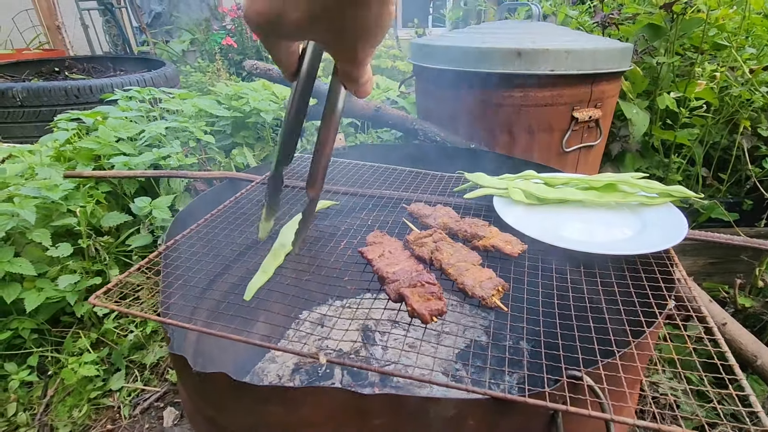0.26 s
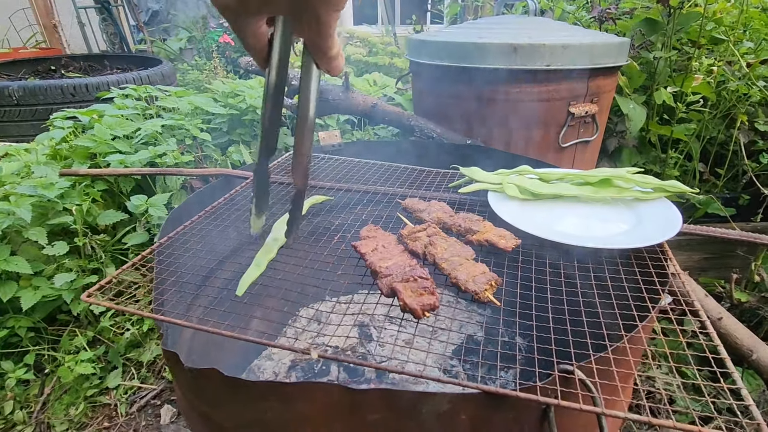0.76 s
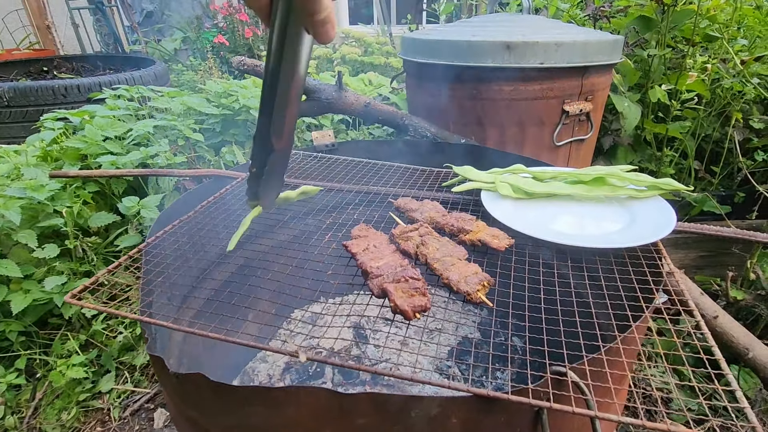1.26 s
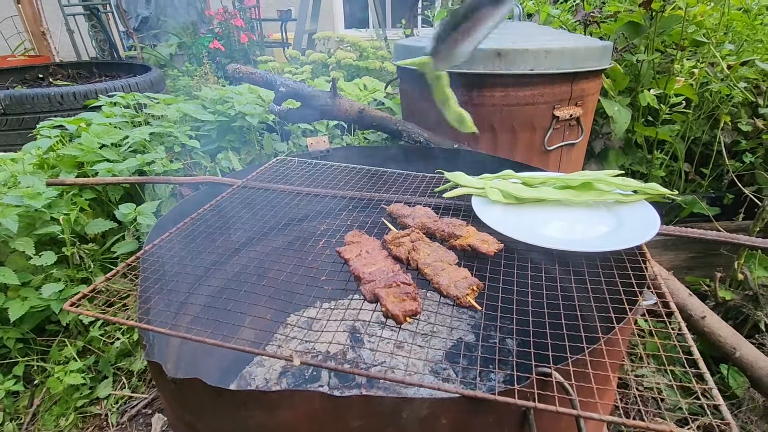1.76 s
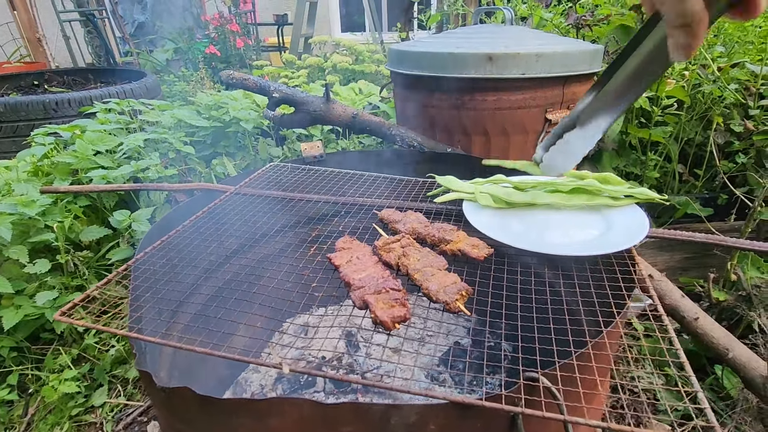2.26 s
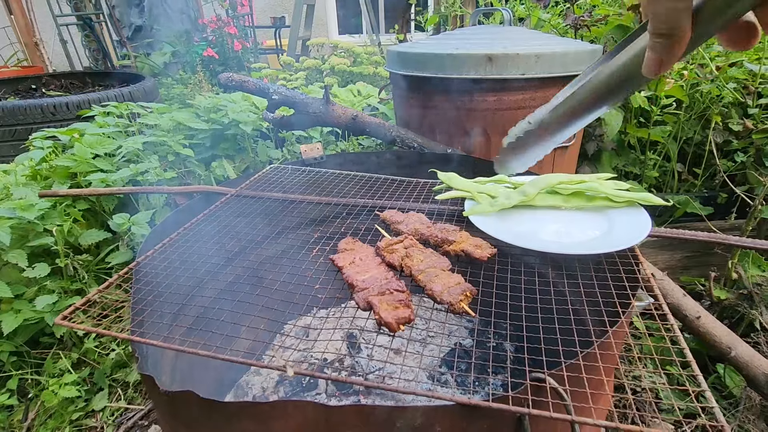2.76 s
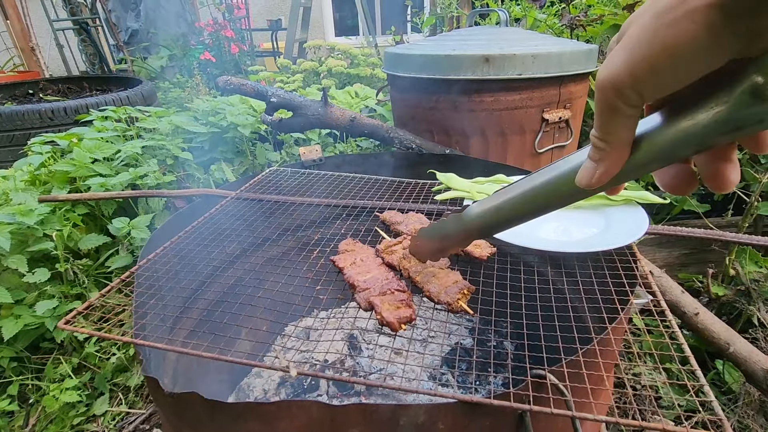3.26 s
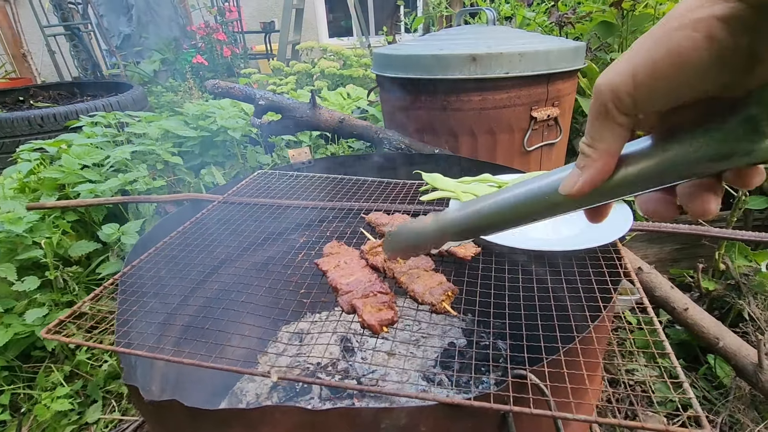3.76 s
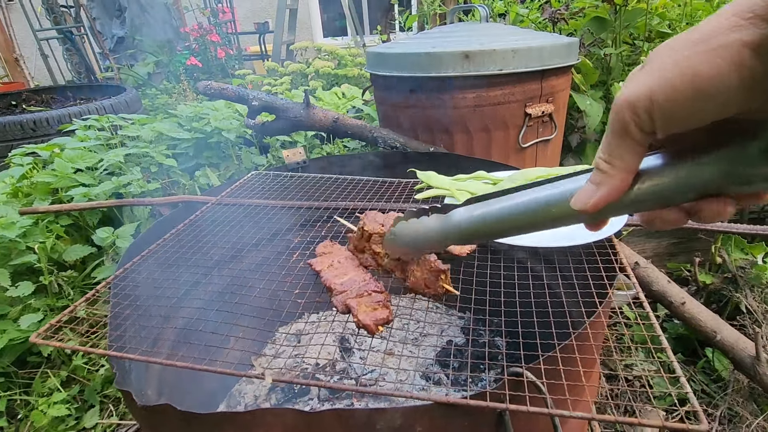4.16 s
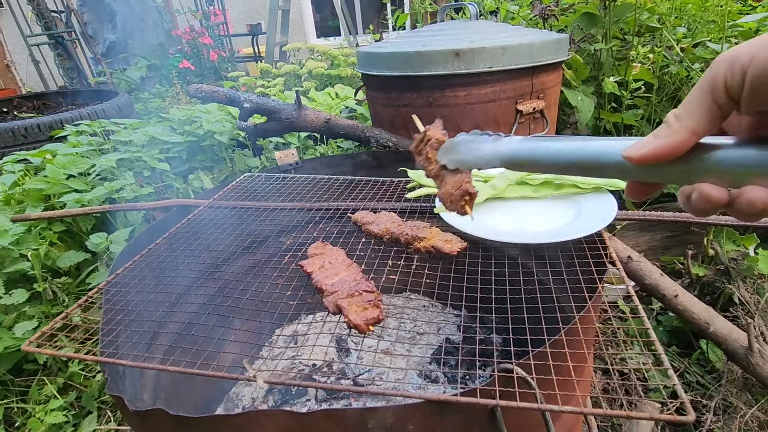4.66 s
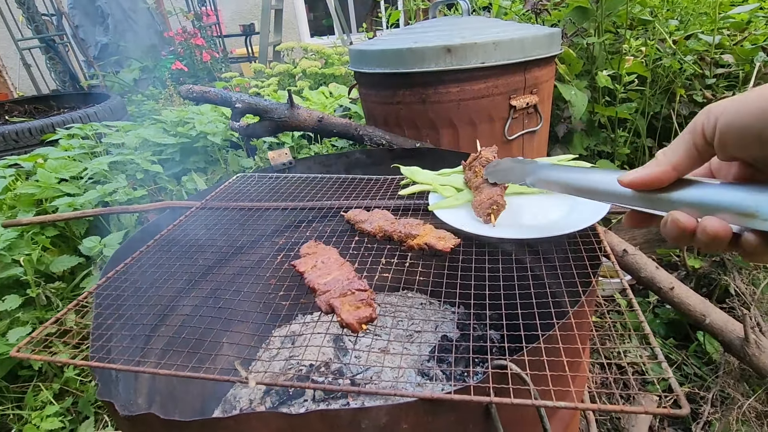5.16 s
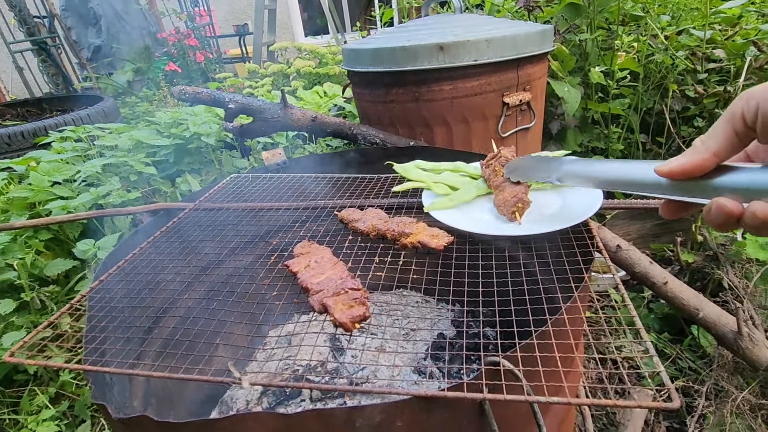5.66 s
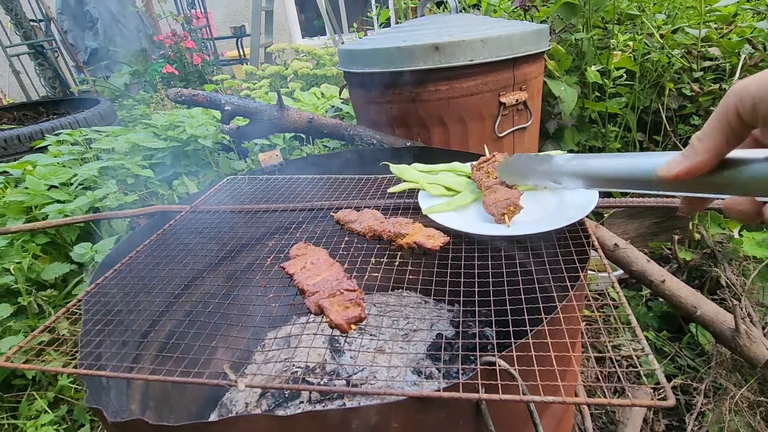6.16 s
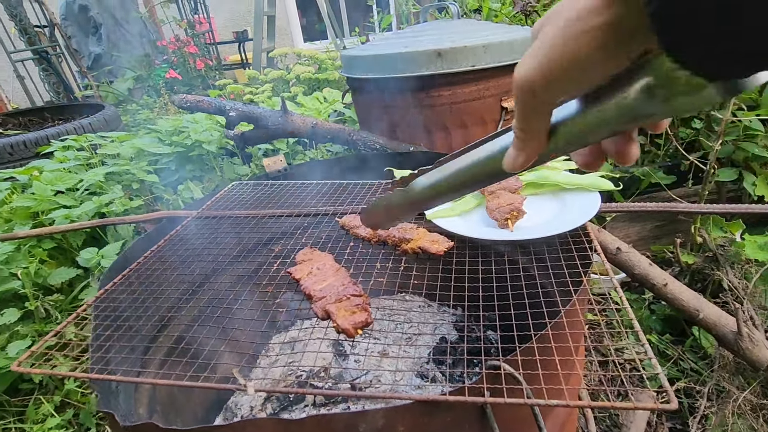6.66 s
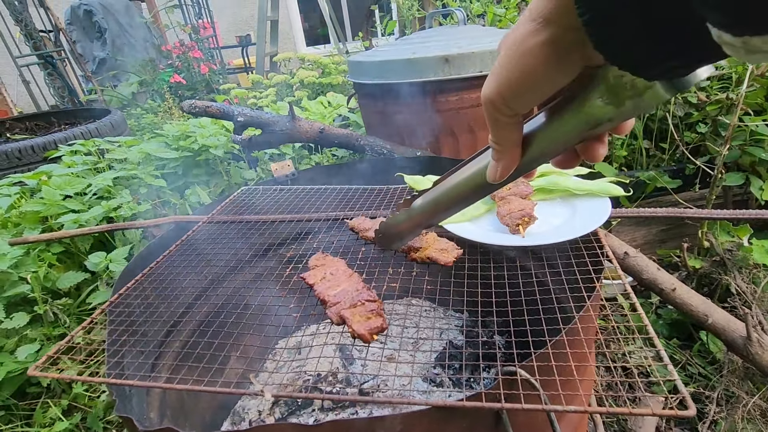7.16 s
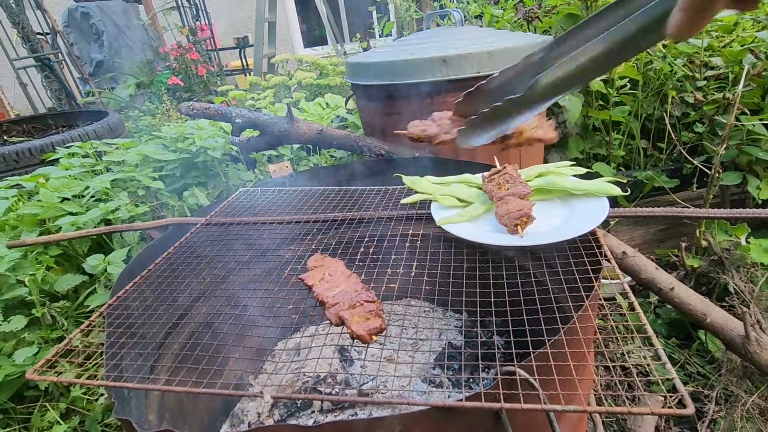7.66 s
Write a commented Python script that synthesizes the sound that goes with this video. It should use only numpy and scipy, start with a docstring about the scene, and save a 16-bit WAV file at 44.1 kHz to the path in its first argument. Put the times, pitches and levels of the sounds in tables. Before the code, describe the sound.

A low pulsing machine hum and soft outdoor air run throughout. Within the first second tongs clatter loudly on thin wire mesh, ringing briefly, and food scrapes free. A light clink on a plate follows, then quiet crackles, muted mesh taps and cloth rustles as more pieces are lifted. A regular distant drip echoes hollowly, a bird trills faintly, and a far engine joins late. The handling is close to a stereo microphone, the background wide and distant.

```python
"""Steel tongs pick food off the wire rack of a charcoal barrel grill in a garden and once set some on a plate.
Rack and tongs ring as banks of dying sines under noise; fat and wood snap in short noise bursts.
Food scrapes and sizzles as it is dragged and a sleeve rustles: random grains shaped by each gesture.
Behind are a throbbing machine hum (sines, narrow noise), a faint regular drip (clicks, filtered noise),
insects (noise bands), a far bird (blurred sines) and, late on, a far motor (gliding harmonics)."""
import sys
import numpy as np
from scipy import signal
from scipy.fft import rfft, irfft
from scipy.io import wavfile

SR = 44100
rng = np.random.default_rng(int(sys.argv[2]) if len(sys.argv) > 2 else 0)


def transcribe(u):
    """Save the signal u as a 16-bit wav file named by the first command-line argument.

    u: samples, shape (n,) or (channels, n), limited to [-1, 1]; the rate is SR.
    q: integer samples, one column per channel.
    """
    v = np.clip(np.atleast_2d(u).T, -1, 1)
    q = np.round(v * 32767).astype(np.int16)
    wavfile.write(sys.argv[1], SR, q)


N = 349272
TIME, HZ = np.arange(N) / SR, np.fft.rfftfreq(N, 1 / SR)
RING = TIME[:SR // 2]  # time axis of one hit [s]
SIDES = np.array([[.5], [-.5]])  # halves of a left-minus-right dB

# main modes of the rack: (frequency [Hz], relative level [dB], t60 [s])
RACK_MODES = [(145, 3, .2), (172, 8, .2), (215, 0, .25), (310, -6, .3), (350, -2.5, .35), (576, 0, .36),
              (602, -2, .4), (957, 0, .35), (1090, -12, .6), (1190, -11, .6), (1658, -5, .28),
              (1752, -5, .25), (2018, -1, .25), (2099, 0, .33), (2218, -7, .22), (2380, -10, .28),
              (2637, 0, .27), (2690, -4, .27), (2920, -4, .3), (3131, -1, .25), (3210, -5, .22),
              (3370, -4, .3), (3444, -3, .2), (3530, -8, .2), (4398, -7, .17), (4613, -10, .18),
              (5135, -7, .14), (5367, -9, .12), (5680, -10, .13), (6191, -13, .12), (7230, -10, .12)]
# spectrum of the weaker wire modes: (frequency [Hz], relative level [dB])
WIRE_SPECTRUM = [(150, -15), (330, 1.5), (450, -13.5), (560, 0), (800, -4.5), (1100, -2), (1400, -6),
                 (1700, -4.5), (2400, -1.5), (3300, -3.5), (4000, -7.5), (5500, -15.5), (7800, -17.5),
                 (9000, -21), (16000, -31)]
# food dragged over the wires, or once set down on a plate:
# (start [s], length [s], scrape [dB before trim], sizzle [dB before trim])
FOOD_DRAGS = [(0.336, 0.29, -72, -69), (0.732, 0.27, -53.5, -67), (0.848, 0.2, -63.5, -74),
              (0.97, 0.061, -73, -64), (1.11, 0.96, -71, -96), (2.535, 0.22, -70, -71.5),
              (4.085, 0.21, -64.5, -65), (4.17, 0.11, -72, -82), (4.296, 0.1, -68, -77),
              (6.618, 0.3, -70.5, -64.5), (6.971, 0.28, -66, -68.5)]
# a drag takes hold quickly, holds for a share of its length, then sinks to LET_GO_DB by its end
GRIP_S, HOLD_SHARE, LET_GO_DB = 0.019, 0.29, -16


def amp(db):
    """Decibels to gain."""
    return 10 ** (np.asarray(db) / 20)


def evened(x):
    """Scales to rms 1."""
    return x / np.sqrt(np.mean(x ** 2) + 1e-30)


def read(points, hz):
    """Interpolates a curve on a log-frequency axis."""
    f, value = np.transpose(points)
    return np.interp(np.log(hz + 1), np.log(f + 1), value)


def add(mix, s, sound):
    """Adds a stereo sound at time s."""
    part = mix[:, max(round(s * SR), 0):][:, :sound.shape[1]]
    part += sound[:, :part.shape[1]]


def wander(hz):
    """Slow random drift of rms 1: noise low-passed at hz."""
    return evened(irfft(rfft(rng.standard_normal(N)) / (1 + (HZ / hz) ** 4), N))


def swing(depth_db, hz):
    """Gain that drifts at random within +-depth_db."""
    return amp(depth_db * np.tanh(wander(hz)))


def colour(x, points, size=1024):
    """Causal minimum-phase filter with the given (Hz, dB) curve."""
    log_gain = np.log(amp(read(points, abs(np.fft.fftfreq(size, 1 / SR)))))
    taps = np.fft.ifft(np.exp(np.conj(signal.hilbert(log_gain)))).real
    return signal.oaconvolve(x, taps[None], axes=1)[:, :x.shape[1]]


def spread(gain, pair=None, lean=None):
    """Noise of a given spectrum at two microphones: alike in the bass, less so above; rms 1."""
    # (frequency [Hz], left-right likeness [-1..1])
    likeness = [(60, 1), (130, 0.88), (290, 0.95), (640, -0.042), (1410, -0.1), (3100, -0.039),
                (6820, -0.023), (15000, -0.05)]
    # (frequency [Hz], left minus right [dB])
    usual_lean = [(60, -0.5), (110, 3), (200, 1), (380, -4), (700, 3.5), (1290, 2.5), (2380, 2),
                  (4400, -5.5), (8120, -5.5), (15000, 5)]
    if lean is None:
        lean = usual_lean
    a, b = rfft(rng.standard_normal((2, N)) if pair is None else pair)
    same = np.clip(read(likeness, HZ), -1, 1)
    right = same * a + np.sqrt(1 - same ** 2) * b
    return evened(irfft(np.array([a, right]) * gain * amp(SIDES * read(lean, HZ)), N))


def fuzzy(lines):
    """Unsteady tones: noise in narrow resonances, each at its own rms level."""
    power = np.zeros(len(HZ))
    for hz, width_hz, db in lines:
        resonance = evened(1 / (1 + ((HZ - hz) / width_hz * 1.89) ** 2))
        power += (amp(db) * resonance) ** 2
    return np.sqrt(power.mean()) * spread(np.sqrt(power))


def grains(per_s, spread_db):
    """Random tiny clicks, a few much larger than the rest; rms 1."""
    sizes = amp(spread_db * np.minimum(rng.exponential(1, (2, N)), 4))
    present = rng.random((2, N)) < per_s / SR
    return evened(sizes * rng.choice([-1, 1], (2, N)) * present)


def modes(table):
    """Dying sines; the higher the mode, up to 1.5 kHz, the more its phase differs between the microphones."""
    out = np.zeros((2, len(RING)))
    for hz, db, t60_s in table:
        t = RING[:round(t60_s * SR)]
        phase = 2 * np.pi * rng.random() + SIDES * rng.choice([-1, 1]) * min(hz / 1000, 1.5)
        out[:, :len(t)] += amp(db - 60 * t / t60_s) * np.sin(2 * np.pi * hz * t + phase)
    return out


def chatter(sound, length_s, bounce):
    """A first touch and a quickly fading run of bounces."""
    touches = bounce * rng.standard_normal(len(RING)) * (rng.random(len(RING)) < 900 / SR)
    touches *= np.exp(-RING / max(length_s, 1e-4))
    touches[0] = 1
    return signal.fftconvolve(sound, touches[None], axes=1)[:, :len(RING)]


def blow(sound, levels_db, size=768):
    """Sets how strongly one contact drives the body, bright and top ranges in its first instants."""
    # body, bright and top ranges: (from [Hz], to [Hz])
    ranges = [(500, 4000), (4500, 8500), (9000, 16000)]
    hz = np.fft.rfftfreq(size, 1 / SR)
    power = 2 * (abs(rfft(sound[:, :size])) ** 2).mean(0) / size ** 2
    body, bright, top = (db - 10 * np.log10(power[(hz > lo) & (hz < hi)].sum())
                         for db, (lo, hi) in zip(levels_db, ranges))
    return colour(sound, [(3500, body), (5300, bright), (7600, bright), (10000, top)])


def blur(hz):
    """Many paths from a far source: a random drift of gain and phase at each microphone."""
    return np.array([wander(hz) + 1j * wander(hz) for _ in SIDES])


def mains_hum(hz=120, level_db=-46, drift_rad=0.087, drift_hz=0.56):
    """Steady mains hum: one sine of slowly drifting phase."""
    hum = np.sin(2 * np.pi * hz * TIME + drift_rad * wander(drift_hz))
    return np.sqrt(2) * amp(level_db) * hum * amp(SIDES * 0.69)


def machine_drone():
    """A machine's unsteady tones: narrow noise bands wavering together."""
    # (frequency [Hz], width [Hz], level [dB before wavering])
    tones = [(117.3, 16, -65), (189, 45, -71), (234.4, 19, -62), (348, 39, -77), (694, 113, -73.5)]
    return fuzzy(tones) * swing(2.0, 4.8)


def outdoor_air(level_db=-53, gust_hz=180):
    """Coloured noise that swells gently, its low rumble coming and going more."""
    # (frequency [Hz], relative level [dB])
    air_spectrum = [(15, -15.5), (26, 4), (34, -12.5), (50, 2.5), (80, 2.5), (105, -1.5), (150, -8.5),
                    (200, -10), (280, -14), (400, -21), (500, -29.5), (1000, -28.5), (2000, -38.5),
                    (6000, -53), (15000, -70.5)]
    air = amp(level_db) * swing(1.5, 5.1) * spread(amp(read(air_spectrum, HZ)))
    rumble = irfft(rfft(air) / (1 + (HZ / gust_hz) ** 4), N)
    return air + rumble * (swing(2.0, 9.8) - 1)


def insects():
    """Insects: two overlapping noise bands that flicker together."""
    # (frequency [Hz], width [Hz], level [dB before flicker])
    chirr_bands = [(4790, 150, -78.5), (4570, 710, -81)]
    return fuzzy(chirr_bands) * swing(2.5, 11)


def throb(hz=57.84, level_db=-56, drift_rad=1.5, drift_hz=4):
    """The machine's low note, a sine of drifting phase, swells once a second and slowly grows."""
    crest_s, period_s, depth_db, growth_db_per_s = 0.66, 1, 4, 0.5
    swell_db = growth_db_per_s * (TIME - TIME.mean())
    swell_db += depth_db * np.cos(2 * np.pi * (TIME - crest_s) / period_s)
    tone = np.sin(2 * np.pi * hz * TIME + drift_rad * wander(drift_hz))
    return np.sqrt(2) * amp(level_db + swell_db) * tone


def drag_force(start_s, length_s):
    """Gain over time of one drag: grip, hold, release."""
    t = TIME - start_s
    released = np.maximum(t / length_s - HOLD_SHARE, 0) / (1 - HOLD_SHARE)
    return np.clip(t / GRIP_S, 0, 1) * amp(LET_GO_DB * released)


def crackle_spectrum():
    """Gain over frequency shared by sizzle and cloth."""
    # (frequency [Hz], relative level [dB])
    crackle_curve = [(150, -8), (500, 6), (1000, 1), (2000, -2.5), (3000, 1.5), (4000, -3.5), (5200, 2),
                     (6700, -4), (7600, -0.5), (8700, -12.5), (10500, -8.5), (15000, -12)]
    return amp(read(crackle_curve, HZ))


def crackle(per_s, spread_db, flicker_db):
    """Dense, flickering coloured grains of rms about 1."""
    return spread(crackle_spectrum(), grains(per_s, spread_db)) * amp(flicker_db * wander(34))


def sizzle(trim_db=1, still_db=-81.5, per_s=6000, spread_db=2.5, flicker_db=2.5):
    """Bursting bubbles of fat: faint at rest, flaring whenever food is dragged."""
    flares = sum((amp(db) * drag_force(s, length_s)) ** 2 for s, length_s, _, db in FOOD_DRAGS)
    level = np.sqrt(amp(still_db) ** 2 + flares)
    return amp(trim_db) * level * crackle(per_s, spread_db, flicker_db)


def hiss_swell(middle_s, length_s):
    """Gain over time of one swell of fine hiss: a smooth bell."""
    return np.exp(-(2 * (TIME - middle_s) / length_s) ** 2)


def sleeve(trim_db=1, per_s=6000, spread_db=3.0, flicker_db=0.84,
           crease_per_s=14, crease_db=-12, crease_t60_s=0.078):
    """Fine hiss in swells, mostly cloth rustling as the arm moves, with a crease ticking now and then."""
    # swells of fine hiss: the arm's moves, a scrape's onset, a sizzle as the tongs let go:
    # (crest [s], length [s], level [dB before trim])
    hiss_swells = [(.05, 1, -74), (1.145, 0.21, -68.5), (1.59, 0.72, -69), (2.206, 0.38, -68.5),
                   (2.542, 0.045, -66), (2.757, 0.73, -75), (3.13, 0.11, -72.5), (3.407, 0.092, -72.5),
                   (3.91, 0.12, -71.5), (4.108, 0.064, -63), (4.665, 0.35, -68.5), (4.938, 0.39, -76),
                   (5.6, 0.23, -70.5), (6.057, 0.12, -63.5), (6.242, 0.27, -67), (6.487, 0.43, -69.5),
                   (7.42, 0.34, -69.5), (7.565, 0.21, -73.5), (7.85, 0.73, -71.5)]
    level = np.sqrt(sum((amp(db) * hiss_swell(s, length_s)) ** 2 for s, length_s, db in hiss_swells))
    tick = rng.standard_normal((2, len(RING))) * amp(-60 * RING / crease_t60_s)
    creases = signal.oaconvolve(grains(crease_per_s, 2.0)[:1], tick, axes=1)[:, :N]
    cloth = crackle(per_s, spread_db, flicker_db) + amp(crease_db) * spread(crackle_spectrum(), creases)
    return amp(trim_db) * level * cloth


def snaps(trim_db=-1, tail_db=-26, tail_t60_s=0.2, rise_s=0.0003, split=0.082):
    """Short dry cracks, each with a brief cluster of woody notes and a faint tail from the barrel."""
    # snaps of fat, coals and skewers: (time [s], body [dB before trim], bright [dB before trim],
    # top [dB before trim], t60 [s], pan, left minus right [dB], note [Hz], relative note level [dB])
    snap_events = [(0.06, -82, -76, -76.5, 0.13, 12, 3580, -12),
                   (1.1448, -108.5, -76, -78, 0.025, 22, 3580, -10),
                   (1.175, -88, -68, -81, 0.018, 6, 3550, -10),
                   (1.451, -88, -64.5, -73, .035, 3, 3550, -10),
                   (1.616, -84, -67, -80, 0.036, 0, 3580, -10),
                   (1.701, -84, -67.5, -83, .04, -3, 3580, -10),
                   (1.949, -74, -70, -67.5, 0.013, 6, 3570, -15),
                   (2.9415, -85, -74, -74, 0.051, 0, 3580, -10), (3.217, -65.5, -92, -95, .03, 3, 815, 17),
                   (3.283, -63.5, -64.5, -55.5, 0.023, 2, 3640, 6),
                   (3.893, -69, -63.5, -64, 0.074, -3, 3500, 9), (4.042, -88, -78, -81, .015, 2, 7440, -3),
                   (4.111, -65, -62, -67, 0.037, -9, 5200, 0), (4.1664, -77, -69, -79, .02, 8, 7640, 2),
                   (4.177, -71, -67, -81, 0.014, -4, 5200, 1), (4.302, -67, -86, -93, 0.023, 2, 1540, 12),
                   (4.3846, -56, -71.5, -85, 0.03, 1, 3360, 3),
                   (4.968, -91, -74.5, -89, .018, -5, 7560, -2), (5.703, -88, -79, -74, .025, 2, 3580, -10),
                   (6.118, -81, -78, -75, .03, -4, 3580, -10), (6.859, -62.5, -68, -76, 0.092, -7, 3630, 4),
                   (7.048, -65, -63, -69, 0.079, -7, 3760, 2),
                   (7.0677, -63, -60.5, -62.5, 0.11, -5, 3670, -2),
                   (7.1717, -78, -75, -73, 0.015, -14, 3580, -12)]
    # (frequency [Hz], relative level [dB])
    snap_spectrum = [(500, 8.5), (1500, 0), (2700, 10), (3500, 4), (4300, 6), (5300, 1.5), (7700, -1),
                     (8800, -5), (11000, -3), (13300, 2.5), (16000, -8)]
    out = np.zeros((2, N))
    for s, *levels_db, t60_s, pan_db, hz, note_db in snap_events:
        fade = amp(-60 * RING / max(t60_s, .004)) + amp(tail_db - 60 * RING / tail_t60_s)
        notes = [(hz, note_db, t60_s)]
        notes += [(hz * (1 + side * split), note_db - 6, t60_s / 2) for side in (-1, 1)]
        crack = colour(rng.standard_normal((2, len(RING))) * fade, snap_spectrum) + modes(notes)
        crack *= 1 - np.exp(-RING / rise_s)
        add(out, s, blow(crack, levels_db) * amp(SIDES * pan_db))
    return amp(trim_db) * out


def tongs(trim_db=1, bounce=0.7, rise_s=0.0031, mistune=0.0058, twin_db=-2, twin_damping=0.74,
          cluster_share=0.05, cluster_db=3, cluster_t60_s=0.033, tick_db=1, tick_t60_s=.07):
    """Two steel arms tick and ring slightly out of tune, the gripped one dying sooner; each spot has its own notes."""
    # clinks: (time [s], body [dB before trim], bright [dB before trim], top [dB before trim], chatter [s],
    # pan, left minus right [dB], note of the spot [Hz], relative note level [dB], note t60 [s])
    clinks = [(0.191, -56.5, -53, -64, .0065, -1, 5100, -8, .17),
              (0.747, -68, -52.5, -56, .005, 1, 5060, 10, 0.06),
              (.759, -52, -56, -57.5, 0.007, 0, 7200, -4, .1),
              (0.958, -62, -61, -65, 0.0052, -1, 7260, -4, 0.11),
              (0.973, -60, -53, -65, 0.011, 1, 4920, 20, 0.059),
              (2.541, -65.5, -66, -52.5, .0026, -3, 12070, 4, 0.087),
              (5.595, -71, -54, -59, 0.0074, -1, 6110, -7, 0.055),
              (5.9822, -76, -56.5, -65, 0.0036, 4, 4280, -4, 0.42)]
    # modes of the arms: (frequency [Hz], relative level [dB], t60 [s])
    arm_modes = [(3187, -16, .16), (3620, -15, .13), (4298, -12, .22), (4660, -11, .07), (5350, -5, .06),
                 (5523, -3, .12), (6013, -4, .06), (6916, -1, .06), (6990, -3, .07), (7820, 0, .05),
                 (8328, -6, .07), (8820, -11, .06), (9910, -6, .07), (10120, -10, .04), (10720, -4, .07),
                 (11290, -6, .06), (11400, -7, .05), (11840, -1, .05), (13880, -7, .05), (14040, -3, .05),
                 (14480, -8, .05)]
    out = np.zeros((2, N))
    for s, *levels_db, chatter_s, pan_db, hz, note_db, note_t60_s in clinks:
        tick = rng.standard_normal((2, len(RING))) * amp(tick_db - 60 * RING / tick_t60_s)
        free = [mode for mode in arm_modes if abs(mode[0] - hz) > 100] + [(hz, note_db, note_t60_s)]
        free += [(hz * (1 + step * cluster_share), note_db - cluster_db * abs(step) ** .5, cluster_t60_s)
                 for step in (-1.5, 1, 1, 2.5)]  # short-lived neighbours
        gripped = [(f * (1 + mistune * rng.uniform(-1.2, 1)), db + twin_db, t60_s * twin_damping)
                   for f, db, t60_s in free]
        ring = modes(free + gripped) + chatter(tick, chatter_s, bounce)
        ring *= 1 - np.exp(-RING / rise_s)
        add(out, s, blow(ring, levels_db) * amp(SIDES * pan_db))
    return amp(trim_db) * out


def wire_crowd(wash):
    """The many close modes of the mesh: noise made to ring, its treble dying sooner."""
    # (frequency [Hz], t60 [s])
    wire_t60 = [(300, 0.28), (1200, 0.36), (3000, 0.26), (5500, 0.13), (9000, 0.13), (15000, 0.09)]
    hz, t, z = signal.stft(wash[:, :len(RING)], SR, nperseg=256)
    z = z * amp(-60 * t / read(wire_t60, hz)[:, None])
    return signal.istft(z, SR, nperseg=256)[1][:, :len(RING)]


def wire_taps(length_s, fade_db, t60_s, spread_db, count=40, size=6):
    """Separate light contacts, fading over length_s; each rings its own few short wire notes."""
    low_hz, high_hz = 940, 5200
    out, t = np.zeros((2, len(RING))), RING[:SR // 30]
    for when, strength, *spots in rng.random((count, 2 + size)):
        hz = low_hz * (high_hz / low_hz) ** np.array(spots)[:, None]
        phase = rng.uniform(-1.75, 1, (2, size, 1))
        notes = amp(read(WIRE_SPECTRUM, hz)) * np.sin(2 * np.pi * hz * t + phase)
        tap_db = spread_db * (2 * strength - 1) + fade_db * when
        add(out, when * length_s, notes.sum(1) * amp(tap_db - 60 * t / t60_s))
    return out


def rack(crowd_db=6, bounce=0.48, rough_db=2.0, note_t60_s=0.093,
         loose_db=4, loose_s=0.2, loose_fade_db=-38, loose_t60_s=0.013, loose_spread_db=7):
    """Knocks ring the mesh with a note of the struck wire, one of them on a plate; loose wires go on tapping."""
    # knocks, the one at 2.548 s on a plate: (time [s], body [dB], bright [dB], top [dB],
    # relative bass [dB], rattle [s], note of the struck spot [Hz], relative note level [dB])
    knocks = [(0.198, -48.5, -53.5, -64, -8, 0.026, 2280, 10),
              (.221, -35.5, -40, -59.5, 0.5, 0.014, 2670, 10.5), (.397, -63, -90, -95, -6, .003, 1127, 39),
              (0.423, -66, -89, -90, -4, .003, 1065, 32), (0.707, -48.5, -79, -82, 4, 0.0041, 2000, 8),
              (0.717, -49.5, -71, -85, -4, 0.0028, 2070, 25), (0.735, -54, -64, -72, -4, .003, 2160, 21),
              (.783, -41.5, -46.5, -68, -0.5, 0.0029, 3410, 10.5),
              (.79, -46.5, -50.5, -65, -6, 0.0043, 3150, 15), (.807, -55, -69, -77, -7, 0.0045, 3330, 30),
              (.827, -59, -76, -91, 11, 0.0026, 2710, 23), (.866, -52.5, -74, -93, 10.5, 0.0079, 1560, 17),
              (.888, -54, -75, -95, 3, 0.0033, 1184, 32), (.969, -63, -61, -74, 5.5, 0.015, 2240, 18),
              (.985, -56.5, -59, -69, 6, 0.015, 2710, 16), (2.548, -63.5, -65, -72, -24, 0.016, 2390, 13),
              (3.291, -62.5, -77, -96, 5, 0.006, 2100, 13.5),
              (4.111, -58.5, -58.5, -69, 5, 0.013, 2710, 20), (4.132, -61, -68, -70, 6, 0.0034, 3300, 16),
              (4.183, -64.5, -91, -92, 4, 0.007, 2040, 12), (4.308, -73, -88, -92, -2, .012, 2430, 18),
              (6.665, -62, -75, -70, -1, 0.0051, 2450, 9), (6.743, -65, -73, -74, 11, 0.0043, 1013, 16),
              (6.979, -58.5, -64, -76, 9, 0.011, 1040, 9), (7.002, -66, -72, -94, 6, .003, 2650, 24),
              (7.125, -55.5, -73, -91, 0, 0.0076, 2015, 15)]
    out = np.zeros((2, N))
    shaking = swing(rough_db, 104)
    wash = spread(amp(read(WIRE_SPECTRUM, HZ)), lean=[(0, 0.018)])
    for s, *levels_db, bass_db, rattle_s, hz, note_db in knocks:
        start = round(s * SR)
        crowd = chatter(wire_crowd(wash[:, start:]), rattle_s, bounce) * shaking[start:][:len(RING)]
        crowd *= amp(crowd_db) / crowd[:, :1024].std()
        loose = amp(loose_db) * wire_taps(loose_s, loose_fade_db, loose_t60_s, loose_spread_db, count=30)
        ring = modes(RACK_MODES + [(hz, note_db, note_t60_s)]) + crowd + loose
        ring *= 1 - np.exp(-RING / max(rattle_s / 5, 1e-4))  # the rattle takes a moment to spread
        add(out, s, blow(colour(ring, [(350, bass_db), (1500, 0.012)]), levels_db))
    return out


def bird(fall_hz=190, width_hz=150, trill_hz=18, trill_db=4):
    """Thin trilled notes that fall a little, blurred by distance."""
    # (time [s], level [dB before trill], middle pitch [Hz], length [s])
    bird_notes = [(0.318, -72, 4400, 0.069), (1.078, -72, 4380, 0.17), (1.169, -82, 4340, 0.16),
                  (2.17, -77, 4200, 0.22), (3.08, -74.5, 4350, 0.16), (3.335, -80.5, 4140, 0.11),
                  (5.251, -80.5, 4380, 0.22), (6.833, -76, 4310, 0.33), (7.641, -75, 4380, 0.15)]
    out = np.zeros((2, N))
    paths = blur(width_hz)
    for s, db, hz, length_s in bird_notes:
        t = TIME[:round(length_s * SR)]
        turns = np.cumsum(hz - fall_hz * (t / length_s - .5)) / SR
        note = (paths[:, round(s * SR):][:, :len(t)] * np.exp(2j * np.pi * turns)).real
        trill = amp(db - trill_db * np.cos(2 * np.pi * trill_hz * t))
        add(out, s, trill * note * signal.windows.tukey(len(t), .4))
    return out


def drag(trim_db=-3, per_s=450, spread_db=2.0, clump_db=6.5,
         catch_db=-4, catch_t60_s=0.1, catch_spread_db=6):
    """Dragged food sticks and slips in clumps; each slip stirs mesh modes, and separate catches ring short notes."""
    slips = grains(per_s, spread_db) * swing(clump_db, 36)
    ring = signal.oaconvolve(slips, modes([m for m in RACK_MODES if m[0] > 300]), axes=1)[:, :N]
    force = sum(amp(db) * drag_force(s, length_s) for s, length_s, db, _ in FOOD_DRAGS)
    out = force * amp(trim_db) * (spread(amp(read(WIRE_SPECTRUM, HZ)), slips) + evened(ring))
    for s, length_s, db, _ in FOOD_DRAGS:
        catches = wire_taps(length_s, LET_GO_DB / 2, catch_t60_s, catch_spread_db, count=20)
        add(out, s + GRIP_S, amp(db + catch_db) * catches)  # not trimmed
    return out


def drips(echo_db=-10, echo_t60_s=0.6, echo_rise_s=0.0016, echo_rough_db=3,
          strike_db=22, splash_t60_s=.018, splash_rise_s=0.00042):
    """A far drip taps something hollow at a near-even pace, its pitch varying; walls and garden echo it."""
    # (time [s], level of the first 5 ms [dB], pitch ratio)
    drip_events = [(1.3583, -57.5, 0.92), (1.953, -58, 1), (2.548, -62, 1.24), (3.133, -62, 0.97),
                   (3.7119, -60, 1), (4.304, -67, 1), (4.9025, -56.5, 0.97), (5.4987, -65, 1),
                   (6.0834, -51.5, 1), (6.6648, -63, 0.98), (7.2612, -52.5, 0.98)]
    # colour of the tap: (frequency [Hz], relative level [dB])
    tap_spectrum = [(600, 3), (1200, -24), (1600, 10.5), (1900, -10.5), (2220, 15), (2450, 6), (2750, -14),
                    (3300, -16), (4200, -26), (5700, -6), (7000, -19), (12000, -30)]
    # colour of the garden's echo: (frequency [Hz], relative level [dB])
    echo_spectrum = [(600, -12), (1100, -21), (1550, 6), (1900, -10), (2200, 8.5), (2450, 4.5), (2750, -9),
                     (3400, -1), (4000, -6), (4800, -7), (5700, 2.5), (6600, -23), (12000, -41)]
    # walls that throw the tap back: (delay [s], level against the tap [dB])
    wall_echoes = [(.0115, -14), (.031, -12)]
    out = np.zeros((2, N))
    splash = amp(-60 * RING / splash_t60_s) * (1 - np.exp(-RING / splash_rise_s))
    fade = amp(echo_db - 60 * RING / echo_t60_s) * (1 - np.exp(-RING / echo_rise_s))
    reflections = swing(echo_rough_db, 70)
    for s, db, pitch in drip_events:
        drive, scatter = rng.standard_normal((2, 2, len(RING)))
        strike = amp(strike_db) * (RING == 0)
        tap = colour(drive * splash + strike, [(hz * pitch, gain_db) for hz, gain_db in tap_spectrum])
        tap *= amp(db) / tap[:, :SR // 200].std()
        echo = evened(colour(scatter, [(hz * pitch, gain_db) for hz, gain_db in echo_spectrum]))
        add(out, s, tap + amp(db) * echo * fade * reflections[round(s * SR):][:len(RING)])
        for delay_s, wall_db in wall_echoes:
            add(out, s + delay_s, amp(wall_db) * tap)
    return out


def motor(count=30):
    """A far engine revs up with a short rasp and holds: harmonics glide through resonances over a soft roar."""
    # fixed resonances: (frequency [Hz], gain [dB])
    resonances = [(250, -2), (306, 7), (408, 11.5), (510, -5), (710, 1), (860, 1), (1020, -2.5), (1120, 2),
                  (1230, -1), (1330, -11), (1430, 4), (1530, 3), (1630, -8), (1730, 1), (1850, -21),
                  (2150, -7.5), (2600, -9), (3200, -14)]
    # (frequency [Hz], relative level [dB])
    roar_spectrum = [(150, 1), (600, -1), (1200, 3), (2400, -3.5), (4000, -6), (8000, -27), (16000, -45)]
    start_s, rise_s, harmonics_db, roar_db = 6.76, 0.1, -80.5, -73
    firing_hz, low_share, rev_s, waver = 101.4, .85, .13, .005
    rasp_hz, rasp_width_hz, rasp_rise_hz_per_s, rasp_db, rasp_s = 1580, 63, 560, -65.5, 0.41
    since = np.maximum(TIME - start_s, 0)
    speed_hz = firing_hz * (1 - (1 - low_share) * np.exp(-since / rev_s)) * (1 + waver * wander(4))
    turns, harmonics = np.cumsum(speed_hz) / SR, np.zeros((2, N))
    paths = blur(8)  # fading on the way
    for k in range(2, count):
        path = np.roll(paths, k * N // count, axis=1)  # each harmonic fades at other times
        harmonics += amp(read(resonances, k * speed_hz)) * (path * np.exp(2j * np.pi * k * turns)).real
    rasp_turns = np.cumsum(rasp_hz + rasp_rise_hz_per_s * (since - rasp_s / 2)) / SR
    rasp = (blur(rasp_width_hz) * np.exp(2j * np.pi * rasp_turns)).real
    rasp *= np.sin(np.pi * np.minimum(since / rasp_s, 1))
    roar = spread(amp(read(roar_spectrum, HZ)))
    engine = amp(harmonics_db) * harmonics + amp(rasp_db) * rasp + amp(roar_db) * roar
    return np.minimum(since / rise_s, 1) * engine


def scene():
    """Everything that happens at the grill, over the garden."""
    # balance of hits and bird: (frequency [Hz], left minus right [dB])
    hit_lean = [(150, -5), (400, 2), (700, 0.5), (2400, -1.5), (4400, -4), (7500, -6), (10000, 8),
                (15000, 5.5)]
    garden = mains_hum() + machine_drone() + outdoor_air() + insects() + throb()
    hits = snaps() + tongs() + rack() + bird()
    hits = irfft(rfft(hits) * amp(SIDES * read(hit_lean, HZ)), N)
    return garden + sizzle() + sleeve() + hits + drag() + drips() + motor()


def record(dry):
    """Band limit: a linear-phase low-pass."""
    edge_hz = 15900
    taps = signal.firwin(401, edge_hz, window=("kaiser", 9), fs=SR)
    return signal.oaconvolve(dry, taps[None], "same")


dry = scene()
out = record(dry)
transcribe(out)
```